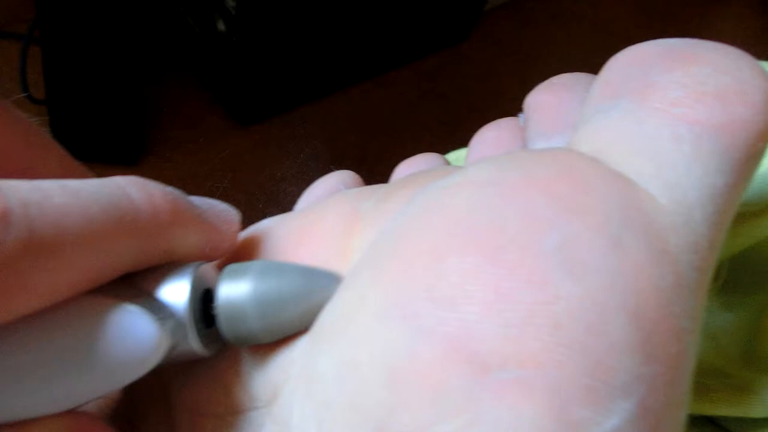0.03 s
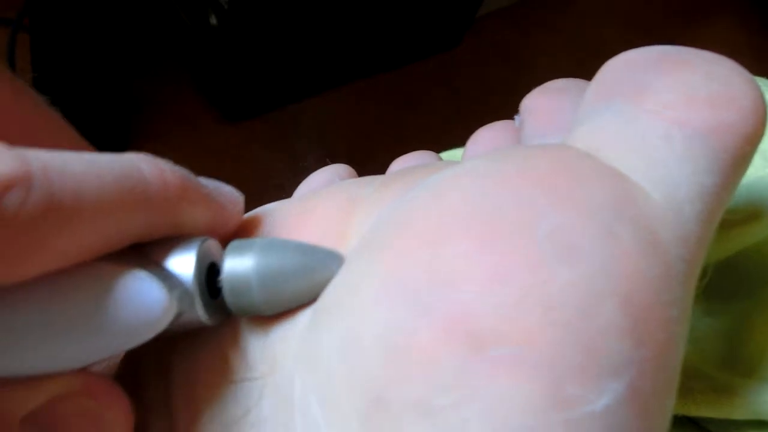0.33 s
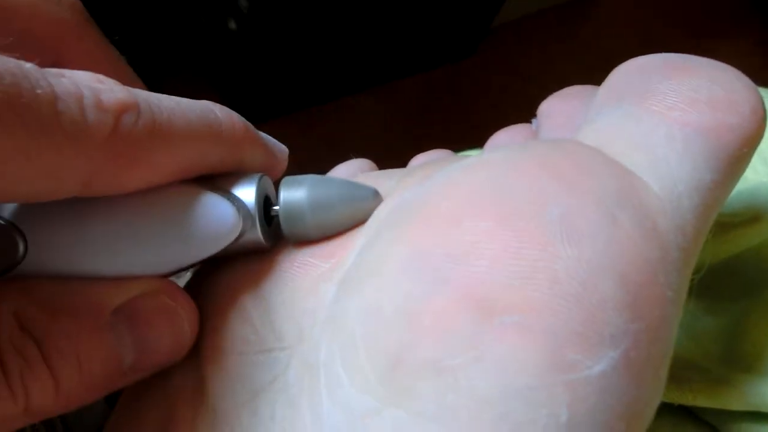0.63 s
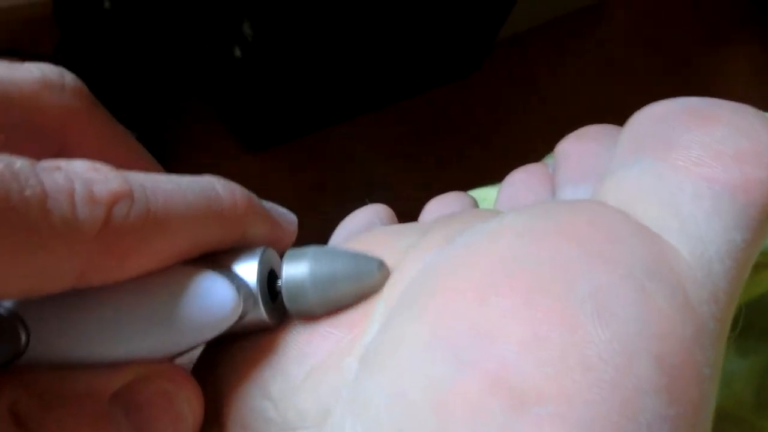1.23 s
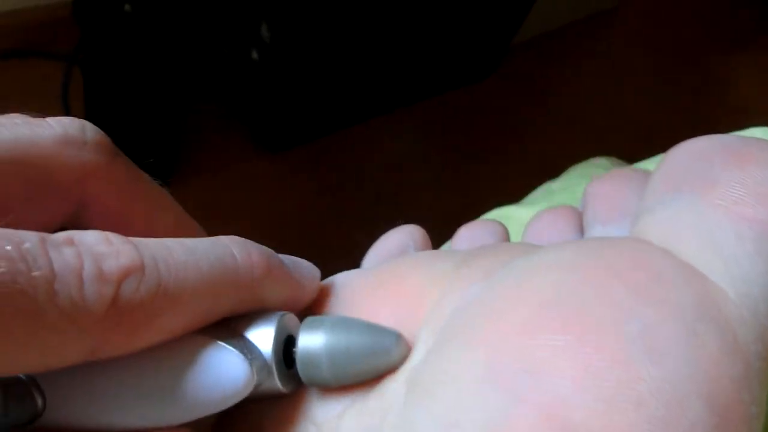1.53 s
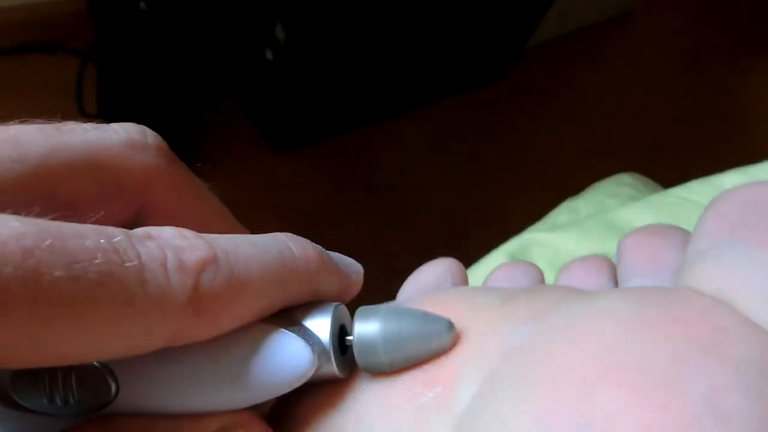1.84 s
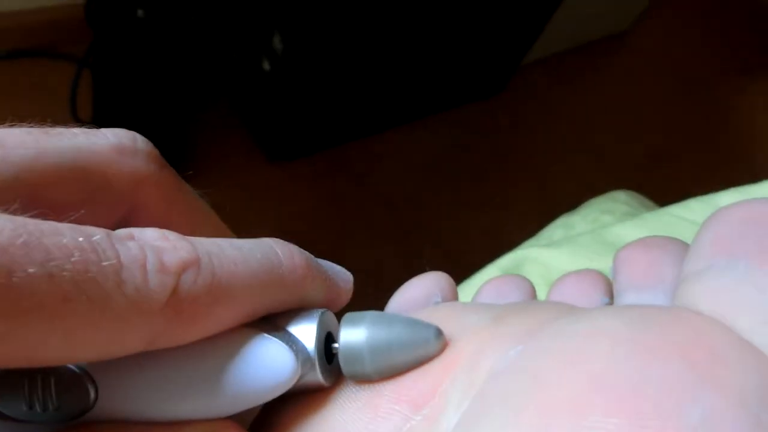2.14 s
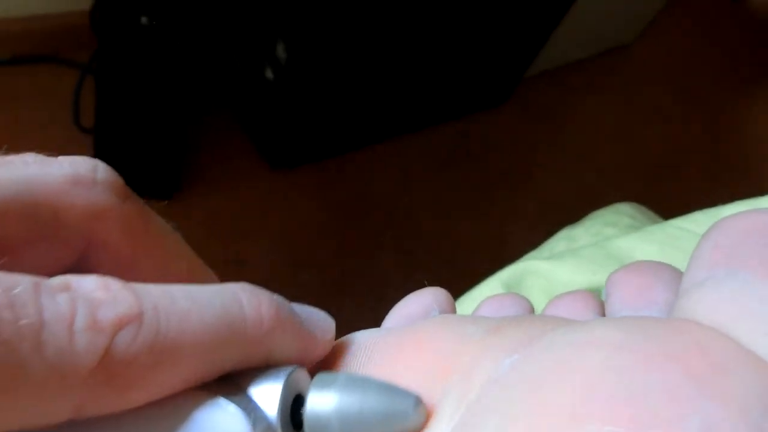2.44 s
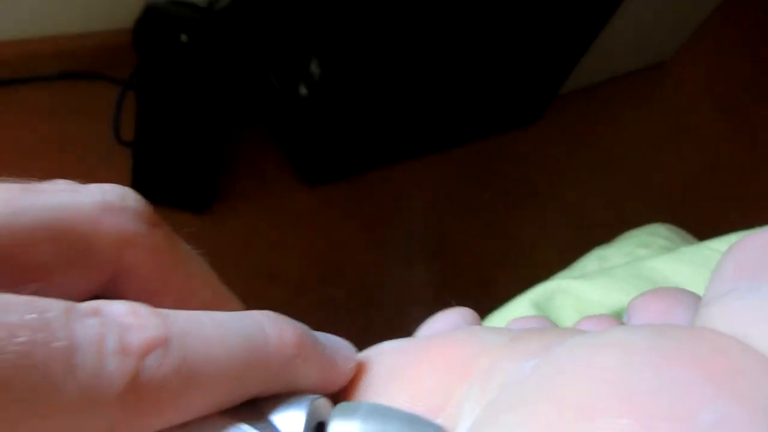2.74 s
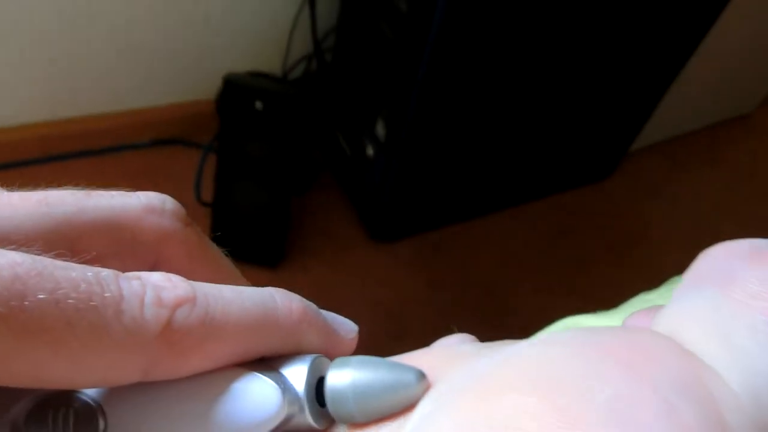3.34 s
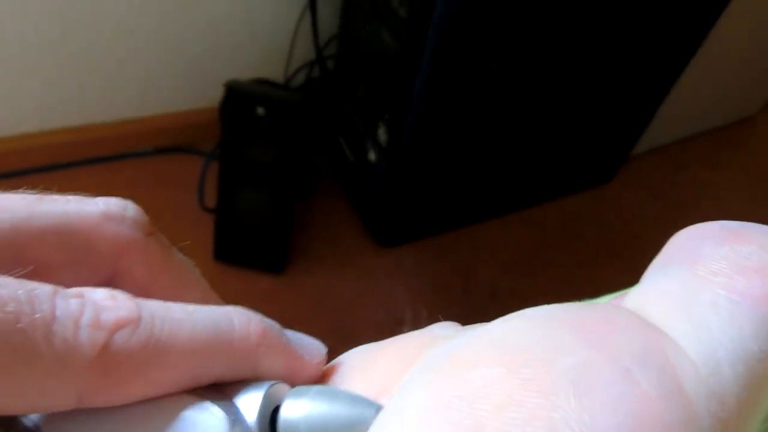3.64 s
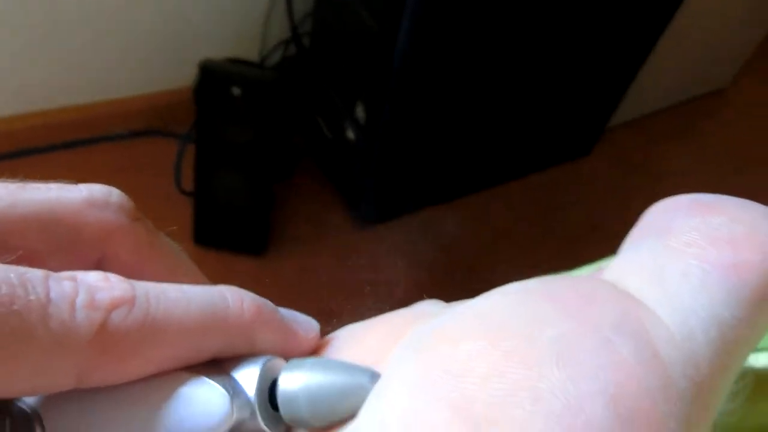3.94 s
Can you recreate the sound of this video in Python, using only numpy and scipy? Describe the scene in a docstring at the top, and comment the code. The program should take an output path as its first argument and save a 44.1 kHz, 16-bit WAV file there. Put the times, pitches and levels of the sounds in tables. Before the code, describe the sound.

A small electric rotary file buzzes and rasps against the skin of a foot.

```python
"""A small electric rotary file runs against the skin of a foot, close up in a quiet room.
After a moment of silence the sound cuts in, the motor already running. The shaft knocks on every turn
(a buzz), shakes the plastic housing (a rattle) and rasps in step with the rotation, over a dull rub.
Thin whines come and go as the speed moves. It sags when the head is pressed harder, most near 1.1, 2.3
and 3.7 s, and from the first of these sags on the housing now and then chatters on one note."""
import sys
import numpy as np
from scipy import signal
from scipy.fft import rfft, irfft
from scipy.io import wavfile
from scipy.ndimage import uniform_filter1d

SR = 44100
rng = np.random.default_rng(int(sys.argv[2]) if len(sys.argv) > 2 else 0)


def pcm_store(signal):
    """Save signal as 16-bit PCM."""
    levels = np.round(np.clip(np.atleast_2d(signal), -1, 1) * 32767)
    wavfile.write(sys.argv[1], SR, levels.astype(np.int16).T)


N = 176400
TIME, HZ = np.arange(N) / SR, np.fft.rfftfreq(N, 1 / SR)


def amp(db):
    """Decibels to gain."""
    return 10 ** (np.asarray(db) / 20)

def unit(x):
    """Scales to rms 1."""
    return x / np.sqrt(np.mean(x ** 2) + 1e-20)

def curve(table, column=1):
    """One column of a time table, at every sample."""
    rows = np.array(table)
    return np.interp(TIME, rows[:, 0], rows[:, column])

def spectrum(points):
    """A frequency table on a log axis, at every bin."""
    hz, value = np.transpose(points)
    return np.interp(np.log(HZ + 1), np.log(hz + 1), value)

def drift(rate_hz):
    """Smooth random wander of rms 1."""
    return unit(irfft(rfft(rng.standard_normal(N)) * np.exp(-(HZ / rate_hz) ** 2), N))

def burst(turns, at, width):
    """A smooth bump at one angle of every turn."""
    return np.exp(-.5 * (((turns - at + .5) % 1 - .5) / width) ** 2)

def steadied(pair, span_s=0.21):
    """Evens out chance swells, so that the level stays near rms 1."""
    power = uniform_filter1d((pair ** 2).mean(0), round(span_s * SR))
    return pair / np.sqrt(uniform_filter1d(power, round(span_s * SR / 2)) + 1e-9)


# Stereo likeness. Each row: frequency in Hz, coherence from 0 to 1.
COHERENCE = [(150, 0.37), (400, 0.27), (1400, 1), (3500, 0.94), (9700, 1), (12100, 0.57), (15000, 0.2)]
# Stereo balance. Each row: frequency in Hz, left minus right in dB.
BALANCE = [(60, 3), (150, 2.5), (380, 1), (950, 1), (2380, 0), (15000, 2)]
# Stereo phase. Each row: frequency in Hz, lag of the right channel in radians.
RIGHT_LAG = [(2600, 0), (6500, 0.4), (9600, 0.88), (10900, 0.28), (12000, 1), (13500, 0)]

def stereo(pair, colour):
    """Colours two unrelated signals and blends them into partly alike channels of rms 1."""
    left, other = rfft(pair) * colour
    alike, lean = np.clip(spectrum(COHERENCE), 0, 1), amp(spectrum(BALANCE) / 2)
    right = (alike * left + np.sqrt(1 - alike ** 2) * other) * np.exp(-1j * spectrum(RIGHT_LAG))
    return unit(irfft(np.array([left * lean, right / lean]), N))


# The motor's pace. Each row: time in seconds, speed in turns per second.
SHAFT_SPEED = [(.17, 123.5), (.27, 128), (.4, 130.7), (.58, 127), (.7, 125), (.78, 126.8), (.89, 127),
               (1.06, 118.6), (1.13, 116.8), (1.2, 118), (1.3, 125.6), (1.5, 135.4), (1.69, 126),
               (1.9, 124.8), (2.04, 126.7), (2.12, 123.4), (2.23, 116.3), (2.32, 116.5), (2.5, 135.6),
               (2.61, 141.8), (2.8, 133.7), (3, 143.1), (3.15, 143.6), (3.42, 131), (3.71, 123), (4, 138)]

def shaft_turns(flutter=0.00114):
    """Counts the turns of the shaft, which sags under pressure and flutters slightly."""
    speed = uniform_filter1d(curve(SHAFT_SPEED), size=2600)
    return np.cumsum(speed * (1 + flutter * drift(29.2))) / SR


# The buzz's tone. Each row: multiple of the shaft speed, strength within its group in dB.
BUZZ_OVERTONES = [(1, -18.5), (2, -22.5), (3, -13), (4, -10.5), (5, -7), (6, -1), (7, -1.5), (8, -6.5),
                  (9, -1), (10, -2), (11, -1), (12, -7.5), (13, -5)]
# The two knocks. Each row: place as a share of the turn, weight in dB, ring in Hz, half width in Hz.
SHAFT_KNOCKS = [(.6, 0, 820, 274), (0.92, -2.5, 1370, 497)]
# Hum faders. Each row: time in seconds, level of multiple 2 in dB, level of multiples 3-4 in dB.
HUM_FADERS = [(0.18, -66, -52), (0.48, -57, -50), (1.14, -65, -49.5), (1.35, -59.5, -56), (2.3, -66.5, -50),
              (2.41, -63.5, -59.5), (3.59, -57.5, -50), (4.0, -59.5, -53)]
# Buzz faders. Each row: time in seconds, fader for multiples 5-8 in dB, fader for 9-13 in dB.
BUZZ_FADERS = [(0.18, -55, -46.5), (0.32, -42, -44), (0.53, -43, -47.5), (0.87, -40.5, -45.5),
               (0.99, -43, -46), (1.07, -55, -43), (1.22, -44, -45), (1.63, -43, -39.5), (2.04, -42, -43),
               (2.25, -47, -45.5), (2.29, -43, -46), (2.38, -46.5, -42), (2.65, -42, -41),
               (3.08, -46.5, -47), (3.32, -42.5, -46.5), (3.4, -40.5, -52), (3.65, -54, -45),
               (3.9, -40.5, -48), (4.0, -45, -45)]

def buzz(turns, fundamental_db=-63, high_trim_db=-0.5, waver=0.027, waver_hz=9, lean_db=0.76):
    """Clean overtones, timed by a low and a higher knock on each turn; the higher ones waver more."""
    groups, mean_speed = np.zeros((5, N)), curve(SHAFT_SPEED).mean()
    for k, db in BUZZ_OVERTONES:
        knocks = sum(amp(weight) * np.exp(-2j * np.pi * k * at) / (1 + 1j * (k * mean_speed - hz) / width)
                     for at, weight, hz, width in SHAFT_KNOCKS)
        strength = amp(db) * (1 + waver * k * drift(waver_hz))
        group = np.searchsorted([1, 2, 4, 8], k)
        groups[group] += strength * np.cos(2 * np.pi * k * turns + np.angle(knocks))
    levels = [fundamental_db, curve(HUM_FADERS), curve(HUM_FADERS, column=2),
              curve(BUZZ_FADERS), high_trim_db + curve(BUZZ_FADERS, column=2)]
    tone = sum(amp(db) * unit(group) for db, group in zip(levels, groups))
    return tone * amp([[lean_db / 2], [-lean_db / 2]])


def grit(turns, repeat, memory_turns, size=400, count=640):
    """Each turn sets off a burst of grit: a share repeats the last turn and slowly wears, the rest is new."""
    worn, fresh = rng.standard_normal((2, count, size))  # one row of noise per turn
    worn = unit(signal.lfilter([1], [1, -np.exp(-1 / memory_turns)], worn, axis=0)[count // 10:])
    rows = np.sqrt(repeat) * worn + np.sqrt(1 - repeat) * fresh[count // 10:]
    track = signal.resample_poly(rows.ravel(), 10, 1)
    samples_into_turn = turns % 1 / np.gradient(turns)
    place = np.floor(turns) * size + samples_into_turn
    return unit(np.interp(place * 10, np.arange(len(track)), track))


# The plastic's ring. Each row: resonance in Hz, half width in Hz, relative strength in dB.
HOUSING_MODES = [(2101, 175, -8), (2455, 420, -1), (2621, 178, 5.5), (2836, 146, -0.5)]
# Rattle faders. Each row: time in seconds, fader below the split in dB, fader above it in dB.
RATTLE_FADERS = [(.18, -47, -44), (.3, -44.5, -43), (.55, -48, -45), (.8, -44, -42), (1, -41.5, -41),
                 (1.2, -44.5, -42), (1.55, -45, -43.5), (2.05, -43, -42.5), (2.3, -44, -42),
                 (2.48, -47.5, -42.5), (2.6, -42.5, -40.5), (3.1, -48, -42), (3.3, -44, -41),
                 (3.55, -44, -39), (3.75, -44.5, -41), (4, -44, -43.5)]

def rattle(turns, lower_trim_db=0.66, upper_trim_db=-1.3, floor=0.77, split_hz=2300):
    """A scuff of uneven strength on every turn rings the plastic housing."""
    scuff = floor + burst(turns, at=0.595, width=0.058) + .5 * burst(turns, at=0.396, width=0.016)
    scuff *= amp(.8 * drift(45))
    pair = np.array([scuff * grit(turns, repeat=0.9, memory_turns=10.7) for _ in range(2)])
    body = sum(amp(db) / (1 + 1j * (HZ - hz) / width) ** 2 for hz, width, db in HOUSING_MODES)
    highpass = 1 / (1 + (split_hz / (HZ + 1)) ** 30)
    lower = steadied(stereo(pair, body * (1 - highpass))) * amp(lower_trim_db + curve(RATTLE_FADERS))
    upper = steadied(stereo(pair, body * highpass)) * amp(upper_trim_db + curve(RATTLE_FADERS, column=2))
    return lower + upper


# The rasp's tone. Each row: frequency in Hz, relative gain in dB.
RASP_EQ = [(1880, -15), (3200, -10), (3830, -9.5), (4170, -4.5), (5060, -4), (7230, -3), (9000, 0.5),
           (12000, 0.5), (15000, -9)]
# Sheen from the head's narrow resonances. Each row: centre in Hz, half width in Hz, lift in dB.
HEAD_MODES = [(5900, 200, 1), (9680, 130, 2), (12080, 160, 3.5)]
# The three crossovers between the rasp's four bands, in Hz.
CROSSOVERS_HZ = [6500, 11400, 12800]
# Rasp faders. Each row: time in seconds, then middle, treble, high treble and top sizzle in dB.
RASP_FADERS = [(0.18, -40.5, -37.0, -37.5, -36), (0.55, -39.5, -36.5, -40.5, -37.5),
               (0.95, -38.5, -33.5, -37.5, -37), (1.15, -39, -35, -38, -36), (1.62, -38.5, -35, -38.5, -35),
               (1.85, -40.0, -36, -38, -39), (2.1, -40.5, -36, -38.5, -39),
               (2.38, -40.0, -36.0, -37.0, -35.5), (3.1, -40.5, -37.5, -40, -38.5),
               (3.35, -40.0, -36.5, -38.5, -37), (4.0, -41.0, -38.5, -39.5, -38)]

def rasp(turns, treble_trim_db=-.4):
    """Gritty friction: its middle ticks sharply once a turn, its treble swells on the turn's far side."""
    tick = 1 + 1.05 * burst(turns, at=.48, width=.024) + .4 * burst(turns, at=.83, width=.05)
    swell = 1 + .6 * burst(turns, at=.08, width=.11)
    flicker = amp(0.13 * drift(1200) + 0.48 * drift(30))
    coarse = np.array([tick * flicker * grit(turns, repeat=0.53, memory_turns=20) for _ in range(2)])
    fine = np.array([swell * flicker * grit(turns, repeat=0.59, memory_turns=33) for _ in range(2)])
    sheen_db = sum(db / (1 + ((HZ - hz) / width) ** 2) for hz, width, db in HEAD_MODES)
    colour = amp(spectrum(RASP_EQ) + sheen_db)
    highpasses = [1 / (1 + (hz / (HZ + 1)) ** 60) for hz in CROSSOVERS_HZ]
    middle, *trebles = -np.diff([np.ones(len(HZ))] + highpasses + [np.zeros(len(HZ))], axis=0)
    out = amp(curve(RASP_FADERS)) * stereo(coarse, colour * middle)
    for column, band in enumerate(trebles, start=2):
        out += amp(treble_trim_db + curve(RASP_FADERS, column)) * stereo(fine, colour * band)
    return out


# The tone of the rub and the room. Each row: frequency in Hz, relative gain in dB.
RUB_EQ = [(20, 5.5), (100, 2), (450, -6.5), (900, 2.5), (1500, -17), (2200, 11), (3300, 4), (5000, -10)]

def rub(level_db=-49):
    """Dull steady noise of the head on skin, over the room's faint rumble."""
    return amp(level_db) * stereo(rng.standard_normal((2, N)), amp(spectrum(RUB_EQ)))


# Whine cues. Each row: multiple of the shaft speed, resonance in Hz, half width in Hz,
# level on resonance in dB, top of the fade in seconds, half length of the fade in seconds.
WHINE_CUES = [(42, 6020, 80, -46.5, 3.05, .15), (44, 5830, 230, -44, 1.5, 3),
              (46, 5400, 130, -47.5, 1.12, .12), (51, 6000, 130, -46, 1.6, .9),
              (57, 7680, 120, -47.5, 1.5, .15), (67, 8470, 130, -47, 2, .12), (76, 9620, 170, -42, .8, .2),
              (76, 9570, 170, -44, 2, .12), (96, 11980, 220, -39, 3.62, .16)]

def whine(turns, waver_db=1.5, smear_rad=.35, roughness=.3):
    """High overtones swell as the speed carries them through a resonance, and throb with the shaft."""
    throb = .6 + burst(turns, at=.55, width=.14)
    out, speed = np.zeros((2, N)), curve(SHAFT_SPEED)
    for k, hz, width, db, at, half in WHINE_CUES:
        phase = 2 * np.pi * k * turns + smear_rad * drift(40)
        nearness = 1 / (1 + ((k * speed - hz) / width) ** 2)
        fade = amp(db + waver_db * drift(14)) * np.exp(-.5 * ((TIME - at) / half) ** 2)
        pulse = unit(throb * (1 + roughness * drift(250)))
        lag = np.interp(hz, HZ, spectrum(RIGHT_LAG))
        out += np.sqrt(2) * nearness * fade * pulse * np.cos([phase, phase - lag])
    return out


# Chatter cues. Each row: centre in seconds, half length in seconds, pitch in Hz, level in dB.
CHATTER_CUES = [(1.16, 0.016, 2360, -42), (1.238, 0.03, 2546, -41), (1.548, 0.029, 2020, -40.5),
                (2.38, 0.024, 2584, -41.5), (2.98, 0.044, 2565, -42), (3.524, 0.025, 2620, -37.5),
                (3.648, 0.03, 2640, -38), (3.76, 0.021, 2760, -40.5)]

def chatter(turns, throb_depth=0.76, smear_rad=0.53):
    """Short surges of one housing mode, throbbing with the shaft and unsteady in pitch."""
    throb = 1 + throb_depth * np.cos(2 * np.pi * (turns - .75))
    out = np.zeros(N)
    for at, half, hz, db in CHATTER_CUES:
        ring = np.cos(2 * np.pi * hz * TIME + smear_rad * drift(70))
        out += amp(db) * np.exp(-.5 * ((TIME - at) / half) ** 2) * unit(throb * ring)
    return out


def scene():
    """One shaft drives every layer except the steady rub."""
    turns = shaft_turns()
    return buzz(turns) + rattle(turns) + chatter(turns) + rasp(turns) + whine(turns) + rub()

def record(dry):
    """Cuts in abruptly on the running motor and takes off the very top of the treble."""
    start_s, fade_s, cutoff_hz = .165, .0015, 15850
    opened = dry * np.clip((TIME - start_s) / fade_s, 0, 1)
    lowpass = signal.firwin(511, cutoff_hz, window=("kaiser", 9), fs=SR)
    return signal.oaconvolve(opened, lowpass[None], "same")


dry = scene()
out = record(dry)
pcm_store(out)
```